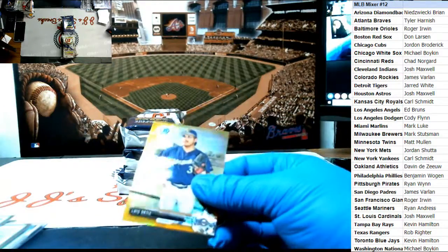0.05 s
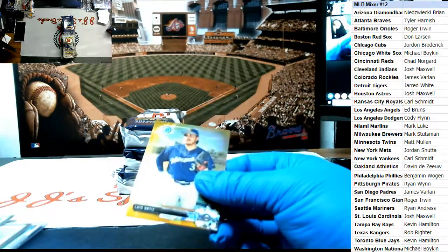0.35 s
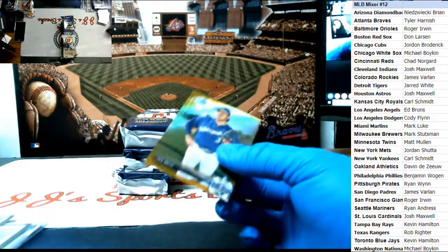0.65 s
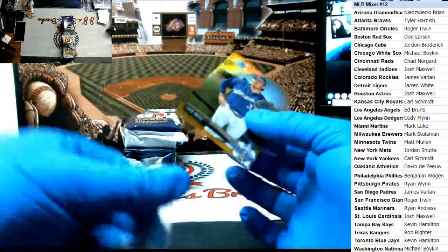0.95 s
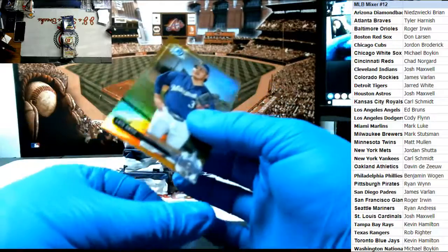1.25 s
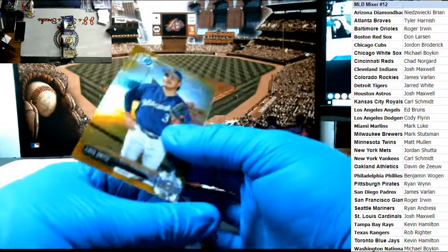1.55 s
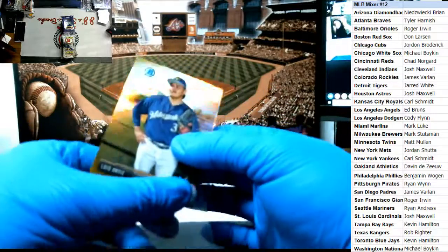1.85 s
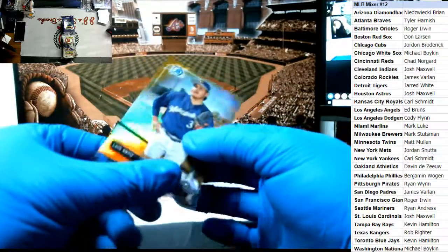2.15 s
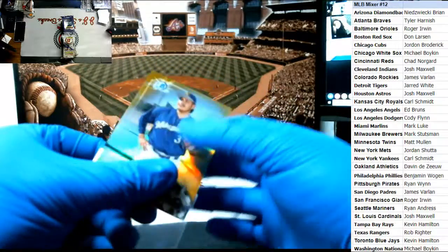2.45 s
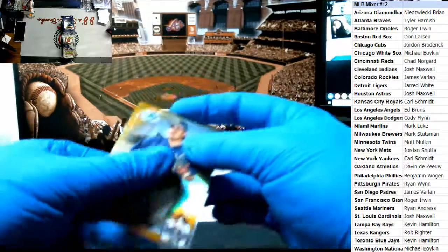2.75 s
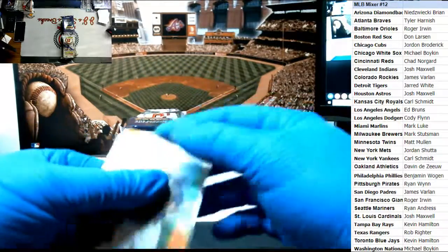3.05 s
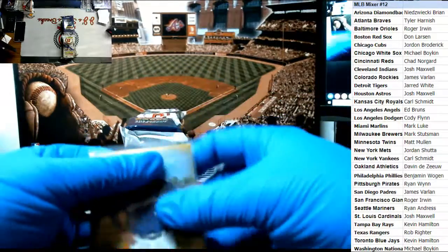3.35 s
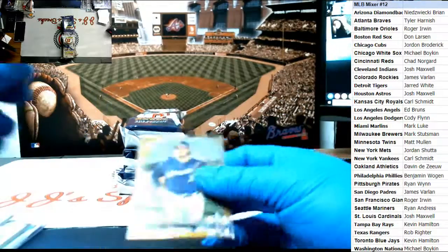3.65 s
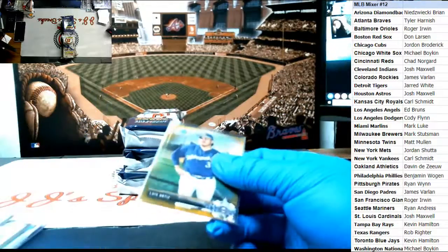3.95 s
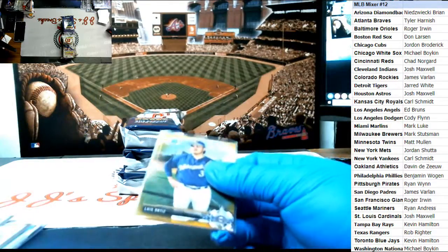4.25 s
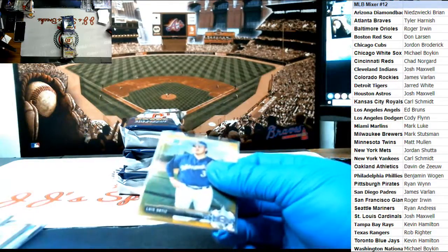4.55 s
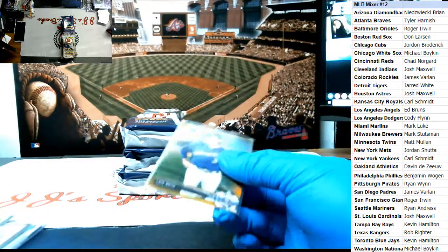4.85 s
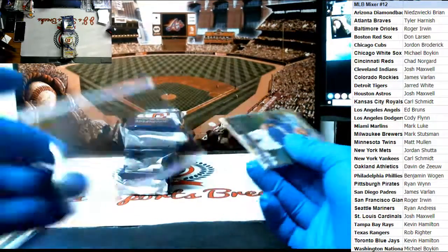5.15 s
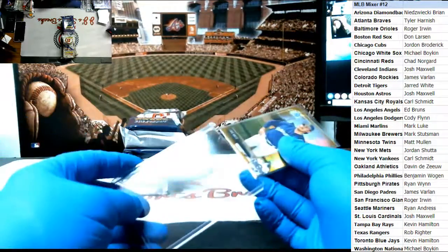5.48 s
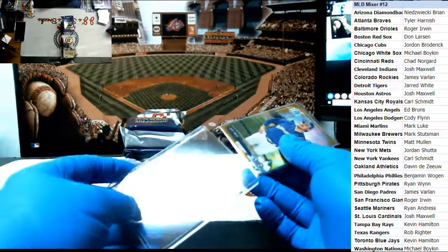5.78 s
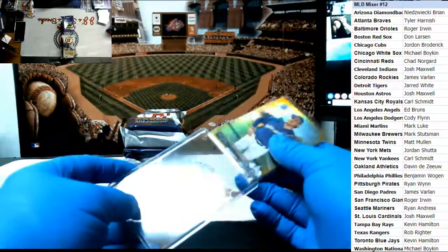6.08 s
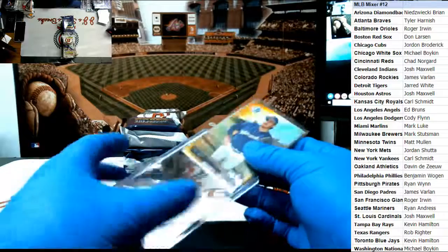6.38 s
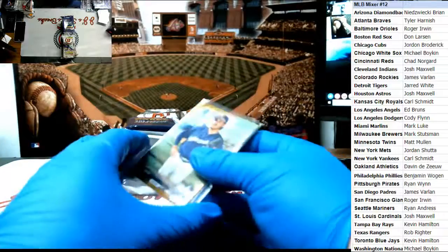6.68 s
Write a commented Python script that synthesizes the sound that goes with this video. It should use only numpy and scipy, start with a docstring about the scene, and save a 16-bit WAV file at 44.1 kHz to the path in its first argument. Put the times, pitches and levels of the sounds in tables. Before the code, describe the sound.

A stiff trading card is turned by hand and slipped in and out of a thin sleeve, its edges snapping, scuffing and squeaking while its faces hiss and the sleeve crinkles. Past the middle, a plastic holder is dragged across a desk and knocks once. Softer sliding and a few light clicks follow. The microphone is close, in a small, dry room with a faintly humming fan.

```python
"""A stiff trading card, turned in gloved hands, slips in and out of a thin sleeve and meets a plastic
holder. Its edges snap, scuff and squeak, its faces hiss as they slide, and the sleeve crinkles.
The holder judders on the desk, is dragged to the edge and knocks once as it is lifted.
A small, dry room with a faintly humming fan; one close microphone."""
import sys
import numpy as np
from scipy import signal
from scipy.fft import rfft, irfft
from scipy.io import wavfile
from scipy.ndimage import uniform_filter1d

SR = 44100
rng = np.random.default_rng(int(sys.argv[2]) if len(sys.argv) > 2 else 0)


def wav_record(signal):
    """Record a signal, one row per channel, as 16-bit PCM in the file named by sys.argv[1]."""
    frames = np.transpose(np.atleast_2d(signal))
    bounded = np.clip(frames, -1, 1)
    # unit amplitude maps onto the largest positive 16-bit level
    quanta = np.round(bounded * 32767).astype(np.int16)
    wavfile.write(sys.argv[1], SR, quanta)


N = 300890
TIME = np.arange(N) / SR
HZ = np.fft.rfftfreq(4096, 1 / SR)


def gain_of(db):
    """Decibels to amplitude."""
    return 10 ** (np.asarray(db) / 20)


def unit_rms(x):
    """Scales to rms 1."""
    return x / np.sqrt(np.mean(x ** 2) + 1e-20)


def curve_at(points, hz):
    """Joins (frequency, value) points on a log-frequency axis."""
    f, value = np.transpose(points)
    return np.interp(np.log(hz + 1), np.log(f + 1), value)


def add(mix, s, sound):
    """Mixes a sound in at time s."""
    part = mix[max(round(s * SR), 0):][:len(sound)]
    part += sound[:len(part)]


def filtered(x, gain):
    """EQ: applies a gain, given as a function of frequency."""
    return irfft(rfft(x) * gain(np.fft.rfftfreq(len(x), 1 / SR)), len(x))


def noise(gain):
    """Noise of rms 1, coloured by an EQ curve."""
    return unit_rms(filtered(rng.standard_normal(N), gain))


def causal(gain):
    """Minimum-phase spectrum for a gain on the HZ grid: it rings only after the blow."""
    log_gain = np.log(np.maximum(gain, gain.max() * 1e-5))
    mirrored = np.concatenate([log_gain, log_gain[-2:0:-1]])
    return np.exp(np.conj(signal.hilbert(mirrored)))[:len(gain)]


def resonances(modes, hz):
    """Gain of a bank of overlapping resonances."""
    return np.sqrt(sum(gain_of(db) ** 2 / (1 + (2 * (hz - f) / width) ** 2) for f, width, db in modes))


def wander(per_s):
    """Smooth random modulation of rms 1 that changes about per_s times a second."""
    return noise(lambda f: np.exp(-(f / per_s) ** 2))


def friction(catches_per_s, catch_share, chatter_db):
    """Countless tiny slips, a few larger catches, and a chattering contact pressure."""
    catches = rng.standard_normal(N) * (rng.random(N) < catches_per_s / SR)
    slips = np.sqrt(1 - catch_share) * rng.standard_normal(N)
    grit = slips + np.sqrt(catch_share) * unit_rms(catches)
    return unit_rms(grit * gain_of(chatter_db * wander(per_s=93)))


def swell(t, rise, fall):
    """Envelope that grows up to t = 0, then dies away."""
    return np.exp(-np.maximum(-t / rise, t / fall))


def strokes(rows):
    """Envelope of a series of short strokes."""
    return np.sqrt(sum((gain_of(db) * swell(TIME - s, rise, fall)) ** 2 for s, rise, fall, db in rows))


def held(t, start, end, ramp_db, attack_s, release_s):
    """Envelope of one steady move: it sets in, gains or loses force evenly, and stops."""
    inside = np.clip(t, start, end)
    progress = (inside - start) / (end - start)
    return swell(t - inside, attack_s, release_s) * gain_of(ramp_db * (progress - .5))


# colour of the fan's air: (frequency [Hz], level [dB])
AIR_EQ = [(15, -67), (25, -34), (110, -5), (227, -4.5), (253, -4.5), (523, -17), (598, -20), (741, -14.5),
          (826, -19.5), (895, -16.5), (1240, -23), (2850, -29.5), (3720, -31), (8350, -34.5), (15500, -40)]
# hum of fan and casing: (frequency [Hz], width [Hz], level [dB])
FAN_HUM = [(187, 24, -80), (257.5, 7.1, -79.5), (526, 9.3, -94), (895, 8.7, -91), (1017, 5, -87.5),
           (1150, 5, -88.5), (2800, 260, -92.5)]
# the motor's whine: (frequency [Hz], level [dB])
MOTOR_WHINE = [(726.7, -81), (872, -78), (2762, -89)]

def fan(air_db=-71.5, flutter_db=0.38, flutter_below_hz=900):
    """The bed: soft air with a fluttering low end, wavering casing tones and a thin steady whine."""
    air = gain_of(air_db) * noise(lambda f: gain_of(curve_at(AIR_EQ, f)))
    low = filtered(air, lambda f: 1 / (1 + (f / flutter_below_hz) ** 4))
    out = air - low + low * gain_of(flutter_db * wander(per_s=9))
    for hz, width, db in FAN_HUM:
        out += gain_of(db) * noise(lambda f: 1 / (1 + ((f - hz) / width * 2) ** 2))
    for hz, db in MOTOR_WHINE:
        out += gain_of(db) * unit_rms(np.sin(2 * np.pi * hz * TIME + .5 * wander(per_s=3)))
    return out


# ring of the holder lying flat: (frequency [Hz], width [Hz], level [dB])
HOLDER_MODES = [(684, 63, -2), (1000, 77, -6), (1310, 170, -9), (1620, 37, -4.5), (2430, 61, -14.5),
                (2870, 32, -16), (4320, 130, -21), (5400, 480, -25), (10700, 1500, -29)]
# nudges to the holder: (time [s], rise [s], fall [s], level [dB])
NUDGE_CUES = [(.034, 0.0094, 0.02, -46), (.058, 0.011, 0.012, -43.5), (.117, 0.0068, 0.0091, -34.5),
              (.132, 0.0084, 0.0077, -36)]

def holder_nudges(bright_db=-38, dull_hz=5500):
    """The flat holder judders on the desk and rings; gentle nudges are duller."""
    judder = friction(catches_per_s=650, catch_share=0.75, chatter_db=-0.5)
    force = strokes(NUDGE_CUES)
    gain = resonances(HOLDER_MODES, HZ)
    gain = gain / np.hypot(1, (520 / (HZ + 1)) ** 4) / np.hypot(1, (HZ / 11500) ** 6)  # low and high cut
    ring = irfft(causal(gain))
    bright = signal.fftconvolve(judder * force, ring / np.linalg.norm(ring))[:N]
    dull = filtered(bright, lambda f: 1 / (1 + (f / dull_hz) ** 10))
    openness = np.minimum(force / gain_of(bright_db), 1) ** 2
    return dull + (bright - dull) * openness


def bass_cut(x, corner_hz=52):
    """Light objects push little deep bass."""
    return filtered(x, lambda f: f ** 2 / (f ** 2 + corner_hz ** 2))


# colour of the handling rumble: (frequency [Hz], level [dB])
RUMBLE_EQ = [(30, -19.5), (90, -5.5), (200, -6.5), (400, -5), (650, -9), (1100, -22), (3000, -56)]
# soft pushes on desk and holder: (time [s], level [dB])
PUSH_CUES = [(.05, -63), (.135, -60.5), (0.309, -63), (.8, -64), (1.005, -71), (1.465, -56.5), (1.776, -49),
             (2.099, -54.5), (2.298, -55.5), (2.481, -62.5), (3.082, -53.5), (3.26, -63), (3.403, -57.5),
             (3.54, -63.5), (4.64, -45), (4.698, -45), (5.3, -61), (5.345, -66)]

def hand_pushes(rise_s=.011, fall_s=.018, fidget_db=-79, lumpy_db=5.0):
    """The dull rumble of hands that push and never keep quite still."""
    rumble = noise(lambda f: gain_of(curve_at(RUMBLE_EQ, f)))
    pushes = strokes([(s, rise_s, fall_s, db) for s, db in PUSH_CUES])
    fidget = gain_of(fidget_db + lumpy_db * np.minimum(wander(per_s=14), 2))
    return bass_cut(rumble * (pushes + fidget))


# bending resonances of card and sleeve: (frequency [Hz], width [Hz], level [dB])
CARD_MODES = [(580, 200, 0.5), (2200, 2500, -4), (3560, 1100, -7.5), (4660, 1200, 0.5), (6530, 870, 1.5),
              (10370, 2000, 6)]

def card_gain(hz, depth, low_hz, top_hz=13300):
    """A small card radiates little bass; a firm grip flattens its resonances (depth under 1)."""
    roll_off = (1 + (low_hz / (hz + 1)) ** 10) * (1 + (hz / top_hz) ** 22)
    return resonances(CARD_MODES, hz) ** depth / np.sqrt(roll_off)


# the card's EQ bands, named body, mid, anchor, ring and top: (frequency [Hz])
CARD_BANDS = [700, 2000, 4200, 7000, 11000]

def contact_eq(hz, body, mid, ring, top):
    """Where the card is touched decides which bands sound, in dB against the 4.2 kHz anchor."""
    return gain_of(curve_at(list(zip(CARD_BANDS, [body, mid, 0, ring, top])), hz))


# card, sleeve and holder slide over each other:
# (start [s], end [s], level [dB], ramp [dB], mid [dB], top [dB])
SLIDE_CUES = [(0.089, 0.134, -49.5, 5, -12, -8.5), (0.456, .575, -55.5, 20, -8.5, -13),
              (0.618, 0.671, -59, 2, -8.5, -6.5), (0.695, 0.763, -64.5, 9.5, -5, 11.5),
              (0.814, .87, -64, -14, 3, -11), (0.88, 0.965, -58.5, -5, -7, -23),
              (1.494, 1.677, -51, 5.5, 6.5, -10.5), (1.69, 1.735, -59.5, -5.5, -21, 1.5),
              (1.752, 1.758, -45, -3.5, -41, -4), (1.806, 1.82, -70, -4.5, -13.5, -27),
              (2.113, 2.144, -48, -3.5, -4, -5.5), (2.281, 2.356, -55, -9, -24, -7),
              (2.488, 2.537, -44, 0, 5, -5.5), (2.795, 2.884, -48.5, 6, -3, 6),
              (2.906, 2.946, -51.5, 13, 6.5, 4.5), (3.103, 3.144, -63, 1, -19, 7),
              (3.177, 3.185, -49, -3, -4, -4.5), (3.23, 3.251, -52.5, 13.5, -7.5, -11),
              (3.506, 3.543, -56.5, 8, 7.5, -16), (3.55, 3.571, -63.5, -1.5, -3, 10.5),
              (4.328, 4.33, -66.5, 7, 3.5, -13), (4.695, 4.86, -56, -5.5, -11, -8.5),
              (4.899, 5.053, -54.5, -7.5, -6, -8), (5.025, 5.166, -61, 6, -13, 5.5),
              (5.265, 5.33, -61.5, -5.5, -7.5, -1), (5.963, 6.045, -51.5, -1, -7, -5),
              (6.153, 6.219, -51, 11.5, -7, -2.5), (6.229, 6.273, -47, 1, 2, -6.5),
              (6.29, 6.553, -50, 0, -11.5, -15.5)]

def sliding_hiss(soft_hz=11200, hard_hz=14000, patchy_db=3.0, trim_db=-1.37):
    """Smooth faces hiss in shifting patches, coloured by the contact; brisker strokes reach higher."""
    grit = friction(catches_per_s=910, catch_share=.15, chatter_db=1.56)
    hz, t, spectra = signal.stft(grit, SR, nperseg=256, noverlap=192)
    patches = uniform_filter1d(rng.standard_normal(spectra.shape), size=3, axis=0)
    patches = uniform_filter1d(patches, size=16, axis=1)
    power = np.zeros(spectra.shape)
    for start, end, db, ramp_db, mid, top in SLIDE_CUES:
        top_hz = np.interp(db + top, [-54, -42], [soft_hz, hard_hz])
        low_hz = np.interp(mid, [-16, -4], [2950, 1530])  # a thin contact also loses its low end
        tone = contact_eq(hz, body=mid, mid=mid, ring=2.5 + .3 * top, top=top)
        tone *= card_gain(hz, depth=0.43, low_hz=low_hz, top_hz=top_hz)
        envelope = gain_of(db) * held(t, start, end, ramp_db, attack_s=.012, release_s=.022)
        power += np.outer(tone, envelope) ** 2
    spectra = spectra * np.sqrt(power) * gain_of(patchy_db * unit_rms(patches))
    return gain_of(trim_db) * signal.istft(spectra, SR, nperseg=256, noverlap=192)[1][:N]


# dull knocks of fingers and holder: (time [s], level [dB], pitch [Hz])
KNOCK_CUES = [(0.117, -51, 372), (.769, -54, 420), (1.018, -51, 87.5), (1.091, -40.5, 637),
              (1.459, -37.5, 610), (2.098, -40.5, 224), (2.292, -48.5, 450), (3.086, -43, 300),
              (3.232, -44, 143), (3.402, -49.5, 198.8), (4.627, -19, 326), (4.699, -42.5, 622),
              (5.333, -53, 143), (6.688, -52.5, 141), (6.743, -56.5, 189)]

def knocks(trim_db=-1.5):
    """Heavily damped blows of a few cycles; lower ones swell and die more slowly."""
    out, t = np.zeros(N), np.arange(4096) / SR
    for s, db, hz in KNOCK_CUES:
        decay_s = 0.002 * (320 / hz) ** 0.17
        envelope = (t / decay_s / 2) ** 2 * np.exp(2 - t / decay_s)
        add(out, s, gain_of(db + trim_db) * envelope * np.sin(2 * np.pi * hz * t))
    return bass_cut(out)


# brief, fuzzy squeaks and groans:
# (time [s], length [s], start pitch [Hz], end pitch [Hz], width [Hz], level [dB])
SQUEAK_CUES = [(0.184, 0.03, 1700, 1610, 130, -46), (0.187, 0.02, 2430, 2420, 150, -45.5),
               (0.289, 0.047, 2696, 2660, 256, -43.5), (0.446, 0.022, 1880, 2160, 266, -48),
               (0.853, 0.017, 1915, 1800, 397, -38), (1.447, 0.013, 465, 540, 40, -36.5),
               (1.473, 0.025, 1051, 950, 130, -37), (1.568, 0.12, 532, 587, 109, -54),
               (1.765, 0.023, 2110, 1850, 600, -43.5), (2.478, .07, 1650, 1800, 248, -51),
               (4.361, 0.018, 1435, 1510, 248, -46.5), (4.487, 0.057, 363.5, 440, 34, -37.5),
               (4.522, 0.13, 933, 1019, 90.5, -42.5), (4.528, 0.068, 515, 598, 80.6, -41),
               (4.536, 0.086, 2520, 2650, 120, -46), (4.578, 0.031, 1174, 1200, 51.3, -32),
               (4.583, 0.052, 2775, 2850, 60, -43), (5.925, 0.11, 924, 1600, 330, -56)]

def edge_squeaks(trim_db=-10):
    """An edge sticks and slips unevenly, exciting one resonance that glides as the contact moves."""
    out = np.zeros(N)
    for s, length, start_hz, end_hz, width_hz, db in SQUEAK_CUES:
        size = int(length * SR)
        glide = np.exp(2j * np.pi * np.cumsum(np.linspace(start_hz, end_hz, size)) / SR)
        real, imag = (filtered(white, lambda f: np.exp(-(f / width_hz) ** 2))[:size]
                      for white in rng.standard_normal((2, SR // 2)))
        fuzzy_tone = (glide * (real + 1j * imag)).real
        fade = np.sin(np.linspace(0, np.pi, size))
        add(out, s, gain_of(db + trim_db) * unit_rms(fuzzy_tone * fade))
    return out


def touch_eq(hz, body, top, ping_db=0, ping_hz=6500, ping_width_hz=1800):
    """A fuller contact lifts the low bands together, a sharper one the highs; a clean release pings."""
    ping = gain_of(ping_db * np.exp(-((hz - ping_hz) / ping_width_hz) ** 2))
    return ping * contact_eq(hz, body, mid=6 + .3 * body, ring=.4 * top, top=top)


# scuffs of card on plastic: (time [s], fall [s], level [dB], body [dB], top [dB])
SCUFF_CUES = [(0.196, .014, -37, -31, -5), (.294, 0.023, -41, -27, -8), (0.321, 0.01, -38.5, -34, -26),
              (0.855, 0.0036, -36.5, -7, 1), (0.954, 0.016, -44, -18, -10), (1.243, .012, -50, -7, -2),
              (1.457, 0.0094, -32, -1, -19), (1.476, 0.0068, -37, 9, -20), (1.493, 0.017, -31.5, 3, -9),
              (1.608, 0.0074, -31.5, -12, -22), (1.779, 0.013, -41, 15.5, -22),
              (2.086, 0.013, -39.5, 11.5, -11), (2.944, 0.0046, -39.5, 6, -14), (2.971, 0.0068, -43, 10, 0),
              (3.075, 0.0072, -21, -10, -5), (3.084, 0.0081, -43, 21, -26), (3.098, 0.034, -39.5, -47, -25),
              (3.173, 0.007, -47, -17, 3), (3.235, 0.014, -45.5, -2.5, -7),
              (3.272, 0.0047, -33.5, -3, -13.5), (3.392, 0.013, -35, -32, -6),
              (3.411, .008, -33, -23.5, -22), (3.759, 0.0078, -59.5, 10.5, -22.5),
              (4.067, .012, -65.5, -10, -0.5), (4.368, 0.0095, -55.5, 26.5, -13.5),
              (5.285, 0.0087, -34, 4.5, -13), (5.337, 0.0072, -45.5, 8, -28), (6.021, .006, -47.5, 7.5, 3),
              (6.052, 0.015, -45.5, -10, -20)]

def card_scuffs(trim_db=-3.5):
    """Short, gritty bursts of friction ring the card."""
    out = np.zeros(N)
    grit = friction(catches_per_s=900, catch_share=0.043, chatter_db=4.0)
    for s, fall, db, body, top in SCUFF_CUES:
        near = abs(TIME - s) < .12
        ring = irfft(causal(card_gain(HZ, depth=0.81, low_hz=458.6) * touch_eq(HZ, body, top)))
        burst = grit[near] * swell(TIME[near] - s, rise=.45 * fall, fall=fall)
        add(out, TIME[near][0], gain_of(db + trim_db) * signal.fftconvolve(burst, ring))
    return out


# one edge slips off another and snaps: (time [s], level [dB], body [dB], top [dB], ping [dB])
SNAP_CUES = [(.4739, -15, -24, -38, -2), (.5788, -2, -22.5, -17, 4.5), (.6605, -41.5, -20, 10, 20),
             (.8136, -18, -19, -13, 4), (.862, -7.5, -26, -6, 3.5), (.896, -8.5, -53, -33, -12),
             (.9485, -10, -53, -35, 3), (1.091, 4, -8, -7, 0), (1.444, -2.5, -29, -18, -1),
             (1.4488, 0, -24, -11.5, -0.5), (1.474, -6, -3, -16, 5), (1.4875, -5, -12, -11, 6),
             (1.5348, -19, -15, -24, 5), (1.6488, -6.5, -12, -12.5, 4), (1.6652, 0.5, -16, -22, 0.5),
             (1.7363, -18, -34, 4, 0), (1.7423, -1, -12.5, 1, 10.5), (2.071, -18, -4, -36, -26),
             (2.0826, 2, -19.5, -18.5, -2.5), (2.3006, -15, -14, -10, 3), (2.9502, -16.5, -25, 6.5, -3.5),
             (2.9617, 3.5, -2.5, 4.5, 18), (3.0688, -5.5, -27, -8.5, 5), (3.0768, 6, -14, -5.5, -7),
             (3.0778, 11, -18, -2.5, 0), (3.2679, -23.5, 8.5, -16, 20), (3.3936, 2, -56, -15, -20),
             (4.5255, -15, 20, -22.5, -8), (4.616, -12.5, 17, -15, 2), (4.6263, -8, 21, -22, -2),
             (5.3327, -13.5, -8, -27.5, 1), (6.2505, -11, -9, -20, -15)]

def card_snaps(spread_s=.0012, rattle=0.58, rattle_s=.0013, bounce=0.18, bounce_s=.0028, trim_db=-6.5):
    """Each release sends a bending wave through the card, rattles its edge and bounces off the desk."""
    out, t = np.zeros(N), np.arange(4096) / SR
    lag_s = spread_s * np.sqrt(4000 / (HZ + 400))  # treble travels faster than bass
    bending = np.exp(-2j * np.pi * np.cumsum(lag_s) * HZ[1])
    desk_echo = 1 + bounce * np.exp(-2j * np.pi * HZ * bounce_s)
    for s, db, body, top, ping_db in SNAP_CUES:
        blow = rng.standard_normal(len(t)) * np.exp(-t / rattle_s) * (1 - np.exp(-2 * t / rattle_s))
        blow *= rattle / np.linalg.norm(blow)
        blow[0] = 1  # a clean click leads the rattle
        ring = causal(card_gain(HZ, depth=0.85, low_hz=450) * touch_eq(HZ, body, top, ping_db))
        add(out, s, gain_of(db + trim_db) * irfft(rfft(blow) * ring * bending * desk_echo))
    return out


# the sleeve crinkles under the thumb: (start [s], end [s], tick rate [1/s], level [dB])
CRINKLE_CUES = [(1.452, 1.516, 200, -54), (1.507, 1.707, 110, -62.5), (3.166, 3.279, 120, -63.5)]

def sleeve_crinkles(high_cut_hz=6000):
    """Tiny buckles of the thin sleeve, each a separate tick."""
    out = np.zeros(N)
    ring = irfft(causal(card_gain(HZ, depth=0.85, low_hz=1200) / np.hypot(1, (HZ / high_cut_hz) ** 2)))
    ring /= np.linalg.norm(ring)
    for start, end, per_s, db in CRINKLE_CUES:
        size = int((end - start) * SR)
        ticks = (rng.standard_normal(SR) * (rng.random(SR) < per_s / SR))[:size]
        add(out, start, gain_of(db) * signal.fftconvolve(unit_rms(ticks), ring))
    return out


# the hollow beneath the holder: (frequency [Hz], width [Hz], level [dB])
HOLLOW_MODES = [(415, 44, 2), (640, 230, -5.5), (970, 72, 0.5), (1260, 210, 2), (1860, 320, -7),
                (2400, 170, -0.5), (2820, 440, -12)]
# the holder's overhang retunes that hollow: (time [s], pitch [ratio])
HOLLOW_BEND = [(4.33, 0.82), (4.47, 1.26), (4.52, 0.86), (4.56, 1.08), (4.60, 0.97), (4.72, 1.01)]
# jerks toward the desk's edge: (start [s], end [s], level [dB], ramp [dB], hiss against scrape [dB])
DRAG_CUES = [(4.38, 4.402, -50.5, 15.5, -6.5), (4.415, 4.513, -46, 7, -13.5), (4.528, 4.58, -39.5, -7, -12),
             (4.641, 4.672, -52.5, -6, -49), (4.674, 4.7, -51, 5.5, -6)]

def holder_drag():
    """A rough scrape through a hollow whose resonances bend up and down, with a thin hiss on top."""
    grit = friction(catches_per_s=490, catch_share=0.21, chatter_db=2.44)
    hz, t, spectra = signal.stft(grit, SR, nperseg=1024, noverlap=768)
    hz = hz[:, None]
    bend = np.interp(t, *np.transpose(HOLLOW_BEND))
    gain = resonances(HOLLOW_MODES, hz / bend)
    gain = gain / np.hypot(1, (300 / (hz + 1)) ** 3) / np.hypot(1, (hz / 3300) ** 6)  # low and high cut
    gain /= np.sqrt(np.mean(gain ** 2, 0))  # even power through the bend
    scrape = signal.istft(spectra * gain, SR, nperseg=1024, noverlap=768)[1][:N]
    # (frequency [Hz], level [dB])
    hiss_eq = [(2000, -41), (4200, 2), (6500, 1.5), (10500, -7), (13000, -24), (16000, -34)]
    hiss = unit_rms(filtered(grit, lambda f: gain_of(curve_at(hiss_eq, f))))
    out = np.zeros(N)
    for start, end, db, ramp_db, hiss_db in DRAG_CUES:
        envelope = gain_of(db) * held(TIME, start, end, ramp_db, attack_s=.0054, release_s=.0065)
        out += envelope * (scrape + gain_of(hiss_db) * hiss)
    return out


# the room's decay by 60 dB: (frequency [Hz], decay time [s])
ROOM_DECAY = [(150, 0.19), (700, 0.053), (3000, .12), (14000, 0.12)]

def room(x, reflections_per_s=3000, predelay_s=.004):
    """Sparse reflections of a small furnished room; the bass hangs on longest."""
    size = SR // 3
    taps = rng.standard_normal(size) * (rng.random(size) < reflections_per_s / SR)
    taps *= np.arange(size) / SR > predelay_s
    hz, t, spectra = signal.stft(taps, SR, nperseg=256)
    decay = gain_of(-60 * t / curve_at(ROOM_DECAY, hz)[:, None])
    tail = signal.istft(spectra * decay, SR, nperseg=256)[1]
    return signal.fftconvolve(x, tail / np.linalg.norm(tail))[:N]


def scene():
    """The mix: the card is close and nearly dry; the desk's sounds excite the room more."""
    card = card_snaps() + card_scuffs() + sliding_hiss() + sleeve_crinkles()
    desk = holder_nudges() + holder_drag() + edge_squeaks() + knocks() + hand_pushes()
    room_send = gain_of(-26.5) * card + gain_of(-13.5) * desk
    return (card + desk + room(room_send) + fan())[None]


# a gentle treble ripple over the whole mix: (frequency [Hz], level [dB])
TREBLE_EQ = [(1500, 0.5), (2000, -1), (2500, -1), (3200, 0), (5200, 0.5), (6400, -1), (7400, 0.5),
             (8400, 1.5), (9600, 0)]

def record(dry, high_cut_hz=16400):
    """A slight treble colouring, then a steep high cut."""
    treble_ripple = irfft(causal(gain_of(curve_at(TREBLE_EQ, HZ))))
    coloured = signal.oaconvolve(dry, treble_ripple[None])[:, :N]
    high_cut = signal.firwin(301, high_cut_hz, window=("kaiser", 9), fs=SR)
    return signal.oaconvolve(coloured, high_cut[None], "same")


dry = scene()
out = record(dry)
wav_record(out)
```